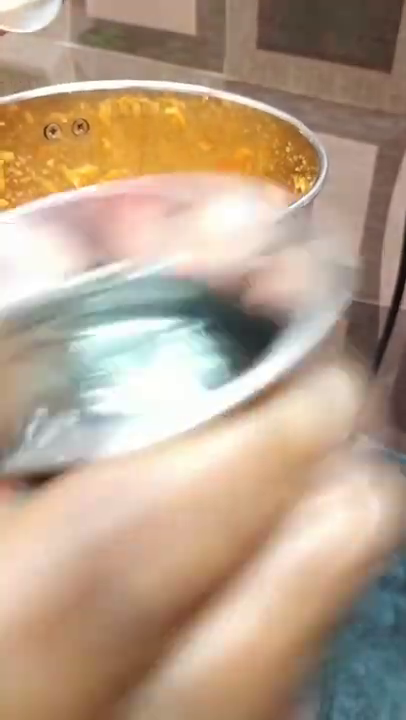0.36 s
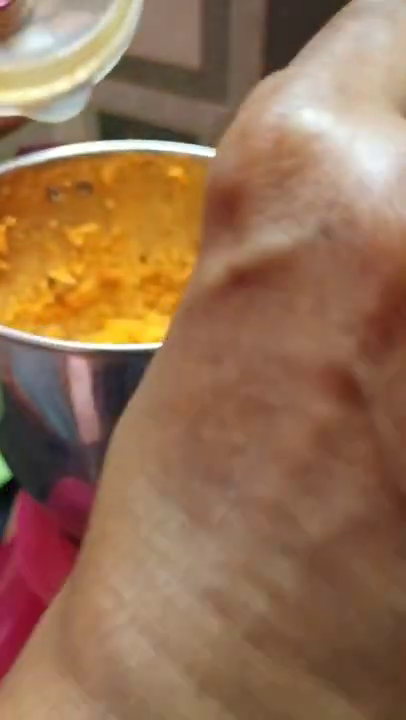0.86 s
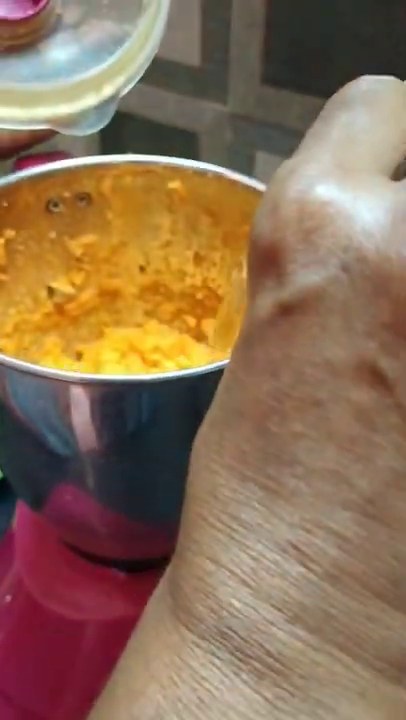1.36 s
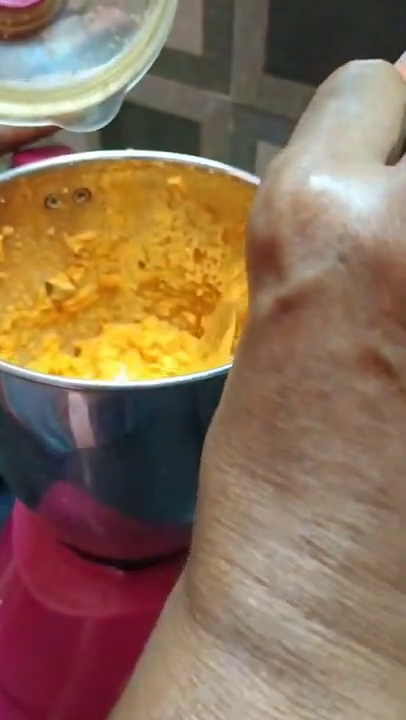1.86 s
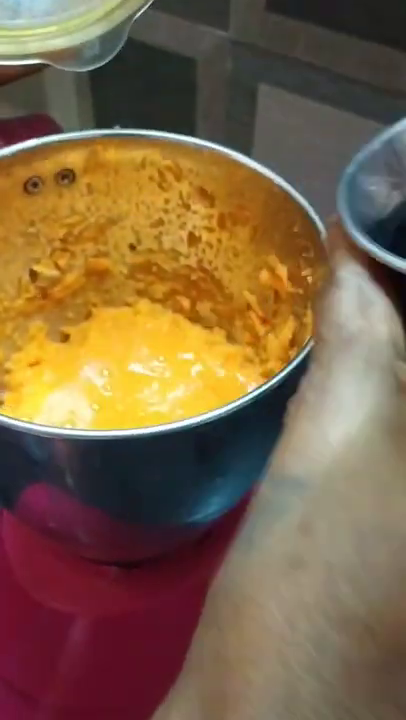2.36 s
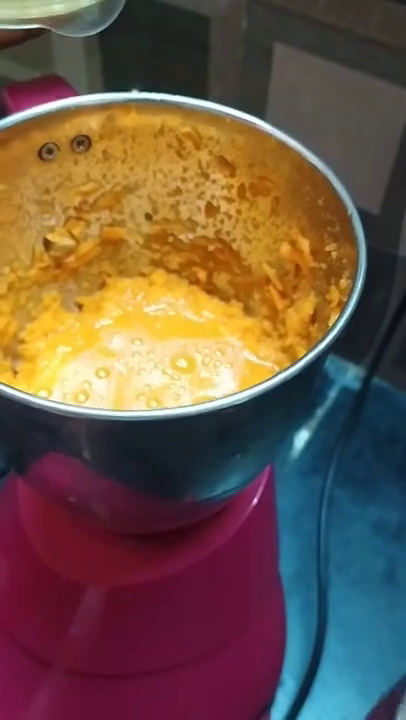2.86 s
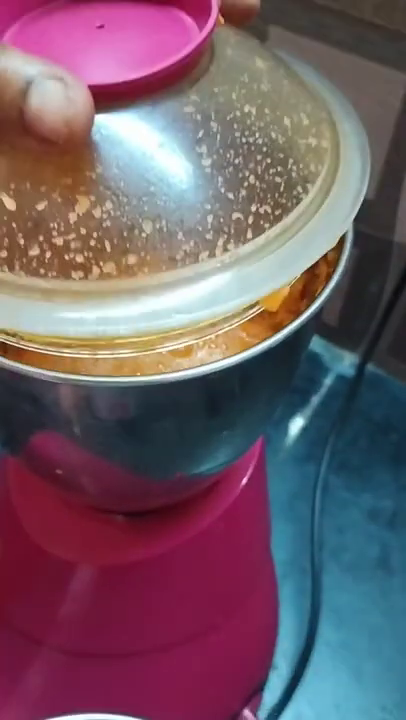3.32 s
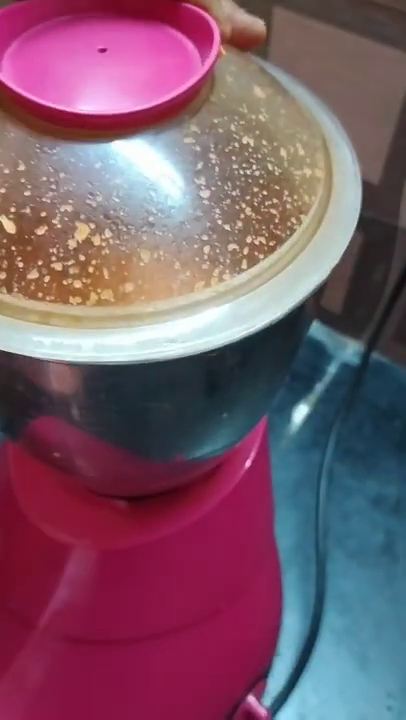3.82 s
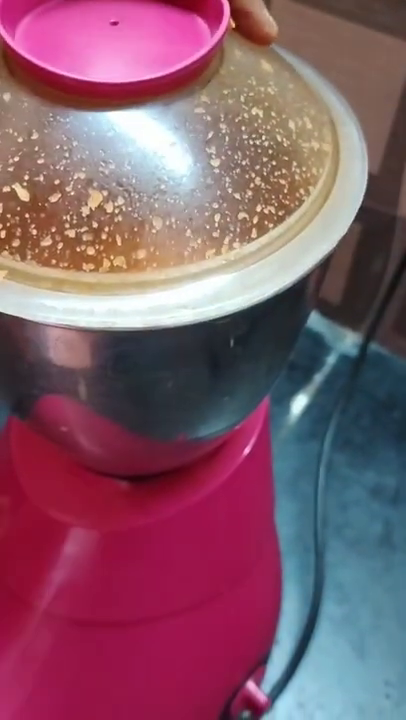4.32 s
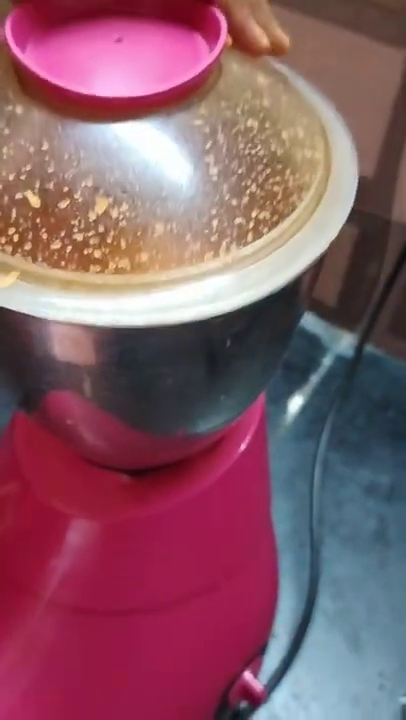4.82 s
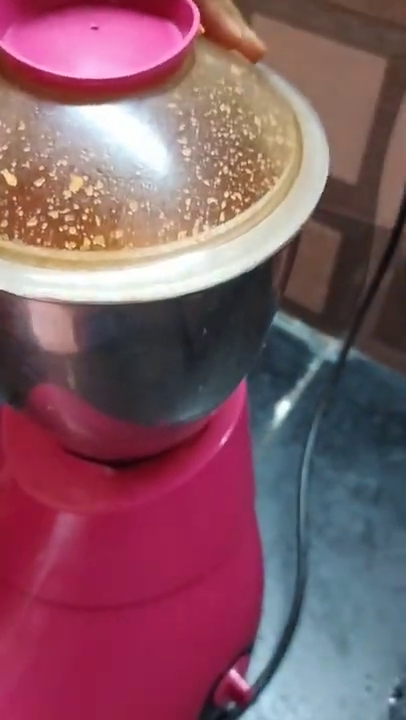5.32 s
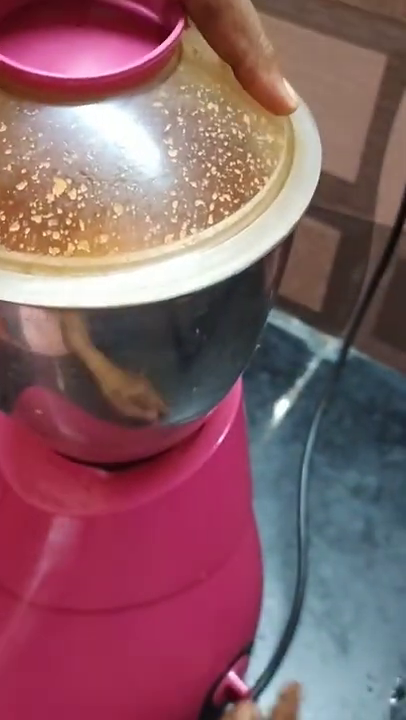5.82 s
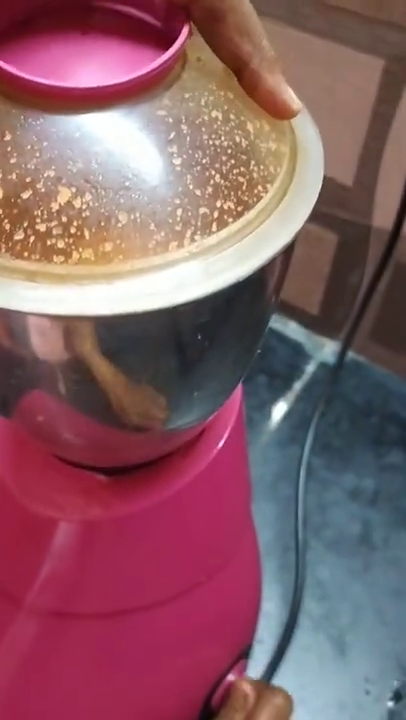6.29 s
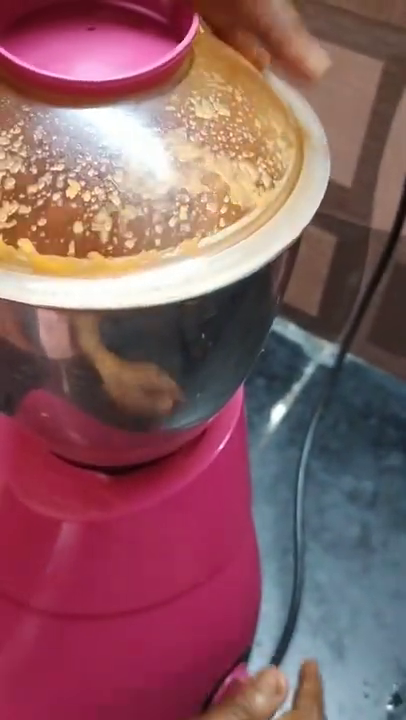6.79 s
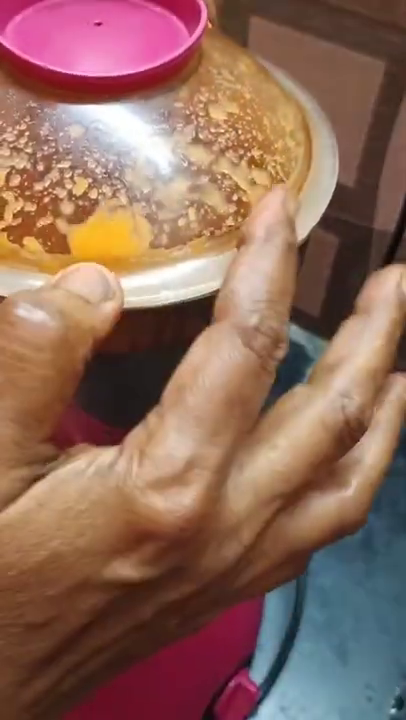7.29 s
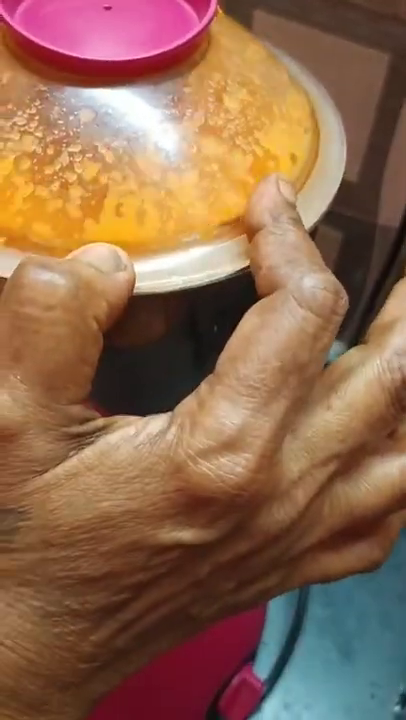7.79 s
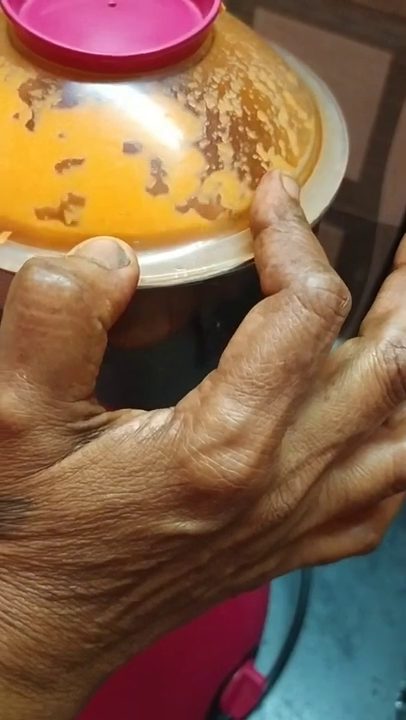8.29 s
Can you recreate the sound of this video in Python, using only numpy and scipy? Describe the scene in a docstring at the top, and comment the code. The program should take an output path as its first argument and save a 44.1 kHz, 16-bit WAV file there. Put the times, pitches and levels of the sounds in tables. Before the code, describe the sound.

Quiet hum first, then water pours onto pulp with bright spatters and low gurgles. Small knocks and a light rustle settle the lid; a metal cup clacks and rings on stone with a short hard echo. A brief near-quiet follows, then a snap and heavy knocks start the blender, much louder than everything before, whirring, booming and hissing with spray. Close stereo handheld microphone, small hard room.

```python
"""A small tiled kitchen with a humming appliance and a few faint far chirps. Water is poured from a steel
cup into a blender jar: flickering noise, gurgles and splash bursts. The lid is pressed on and the cup set
down on the stone counter: bursts, thuds and ringing modes. The motor starts and labours in waves as the
pulp climbs the wall and falls back on the blades: shaft tones on a speed curve, jar boom, churn and spray."""
import sys
import numpy as np
from scipy import signal
from scipy.fft import rfft, irfft, next_fast_len
from scipy.io import wavfile
from scipy.ndimage import uniform_filter1d

SR = 44100
rng = np.random.default_rng(int(sys.argv[2]) if len(sys.argv) > 2 else 0)


def invert_db(level):
    """Linear amplitude ratio for a level in decibels (20 dB per decade), elementwise."""
    return 10 ** (np.asarray(level, dtype=float) / 20)


def unload_wav(signal):
    """Save mono or channel-first audio to the path in sys.argv[1] as 16-bit WAV at rate SR, clipped to [-1, 1]."""
    wavfile.write(
        sys.argv[1],
        SR,
        np.round(np.clip(np.atleast_2d(signal).T, -1, 1) * 32767).astype(np.int16),
    )


N = 381465
T = np.arange(N) / SR


def shape(table, hz, peaks=()):
    """Gain over frequency: spectrum points joined on a log axis, plus resonant bumps."""
    f, db = np.transpose(table)
    db = np.interp(np.log(hz + 1), np.log(f), db)
    return invert_db(db + sum(d / (1 + (2 * (hz - c) / w) ** 2) for c, w, d in peaks))


ALIKE_HZ = 520  # left-right likeness halves here


def spaced(n, alike):
    """Spectra of two noises that agree in the bass only, as at two spaced ports."""
    hz = np.fft.rfftfreq(n, 1 / SR)
    likeness = np.clip(alike, 0, 1) / (1 + (hz / ALIKE_HZ) ** 2)
    mid, side = rfft(rng.standard_normal((2, n)))
    side = side * np.array([[1], [-1]])
    return hz, np.sqrt(1 + likeness) * mid + np.sqrt(1 - likeness) * side


def unit(x):
    """Scales to rms 1."""
    return x / np.sqrt(np.mean(x ** 2))


def walk(n, rate_hz):
    """Random levels held 1 / rate_hz and slewed twice; spread near 1."""
    hold = int(SR / rate_hz)
    steps = np.repeat(rng.standard_normal(n // hold + 1), hold)
    return 1.256 * uniform_filter1d(uniform_filter1d(steps, hold), hold)[:n]


def restless(n, table, peaks, flicker_db, rate_hz, alike=0.96, ripple_db=4.0, per_octave=2):
    """Coloured two-port noise, rms 1, whose bands flicker each on its own."""
    size = next_fast_len(n)
    hz, spectrum = spaced(size, alike)
    # dense narrow resonances of vessel and walls, different at each port
    knots_hz = np.arange(0, SR / 2, 25.)
    ripple = np.array([np.interp(hz, knots_hz, rng.standard_normal(SR // 50)) for _ in "LR"])
    spectrum = spectrum * shape(table, hz, peaks) * invert_db(ripple_db * ripple)
    place = per_octave * np.log2(hz / 30 + 1e-9)
    total = 0
    for k in range(10 * per_octave):
        one_band = irfft(spectrum * np.clip(1 - abs(place - k), 0, 1), size)[:, :n]
        total = total + one_band * invert_db(flicker_db * walk(n, rate_hz))
    return unit(total)


def add(out, s, x):
    """Mixes x in at time s."""
    i = int(s * SR)
    out[..., i:i + x.shape[-1]] += x[..., :N - i]


def band(x, hz, q):
    """Resonant band-pass."""
    return signal.lfilter(*signal.iirpeak(min(hz, SR / 3), q, fs=SR), x)


def burst(db, hz, t60_s, q, pan_db):
    """A snap of noise around hz, decaying 60 dB in t60_s."""
    t = T[:SR // 5]
    envelope = invert_db(-60 * t / t60_s) * (1 - np.exp(-t / 0.00062))
    x = band(rng.standard_normal(len(t)) * envelope, hz, q)
    return invert_db(db + np.array([[pan_db], [-pan_db]]) / 2) * x / abs(x).max()


def curves(table, t):
    """The columns of a table at times t."""
    s, *columns = np.transpose(table)
    return [np.interp(t, s, c) for c in columns]


def swells(t, times, peaks_db, rise_s, fall_s):
    """Bell-shaped swells, summed."""
    return sum(invert_db(db) * np.exp(-((t - s) / np.where(t < s, rise_s, fall_s)) ** 2)
               for s, db in zip(times, peaks_db))


# room air spectrum: (frequency [Hz], relative density [dB per Hz])
AIR = [(12, -32), (20, 4.5), (58, -2), (70, -15), (153, -7), (208, -7), (494, -12.5), (552, -14),
       (793, -16.5), (964, -17), (2050, -19.5), (2560, -18), (4590, -28), (9750, -15.5), (15700, -41.5)]
# room air bumps: (centre [Hz], width [Hz], height [dB])
AIR_PEAKS = [(49, 29, 7), (517, 75, 12.5), (811, 55, 13)]
AIR_DB = -56


def room_air():
    """Steady room noise: coloured bands that flicker slowly."""
    return restless(N, AIR, AIR_PEAKS, 1.53, 8, alike=0.53, per_octave=1) * invert_db(AIR_DB)


# appliance tones: (frequency [Hz], mean rms level [dB])
HUM = [(96.9, -74.5), (145.3, -70.5), (294.5, -74), (393.0, -67.5), (441.4, -63.5), (489.9, -65),
       (635.2, -75.5), (1276, -89), (2401, -87), (2449, -91), (2595, -72)]


def appliance_hum():
    """Sum of wavering sines, out of phase between ports in proportion to frequency."""
    out = np.zeros((2, N))
    for hz, db in HUM:
        phase = 2 * np.pi * rng.random() + hz / 300 * np.array([[0], [1]])
        level = np.sqrt(2) * invert_db(db + 1.25 * walk(N, 2.77))
        out += level * np.sin(2 * np.pi * hz * T + phase)
    return out


# faint chirps: (time [s], peak level [dB], frequency [Hz], length [s])
CHIRPS = [(.0, -62, 2460, 0.035), (0.248, -54, 2400, 0.028), (0.506, -53, 2390, 0.029)]


def far_chirps():
    """Short sine pips with smooth onset and release."""
    out = np.zeros(N)
    for s, db, hz, length_s in CHIRPS:
        t = T[:int(length_s * SR)]
        add(out, s, invert_db(db) * np.hanning(len(t)) * np.sin(2 * np.pi * hz * t))
    return out


# water flow: (time [s], level [dB])
POUR = [(0.6, -64), (0.8, -72), (1.22, -66), (1.28, -63.5), (1.45, -53.5), (1.52, -60), (1.76, -58.5),
        (2.09, -46.5), (2.2, -58), (2.33, -48.5), (2.36, -43.5), (2.48, -66), (2.7, -71)]
# stream spectrum: (frequency [Hz], relative density [dB per Hz])
STREAM = [(590, -40), (1000, -12), (1450, -8), (1820, 3), (2040, -0.5), (3350, -3.5), (5010, -10),
          (9230, 3.5), (15700, -24)]
# air escaping: (time [s], level [dB])
GLUGS = [(1.06, -73), (1.21, -72), (1.44, -63), (2.08, -55), (2.22, -50), (2.36, -54), (2.43, -54),
         (2.62, -58)]
GURGLE_RE_FLOW_DB, GLUG_RISE_S, GLUG_FALL_S = -3.5, 0.0105, 0.021


def pouring():
    """A thin stream crackles on the pulp as random grains; trapped air gurgles in low bands."""
    s, flow_db = np.transpose(POUR)
    n = int((s[-1] - s[0]) * SR)
    t = s[0] + T[:n]
    flow = invert_db(np.interp(t, s, flow_db))
    grains = (rng.random(n) < 600 / SR) * invert_db(2.5 * rng.exponential(size=n))  # 600 per s
    crackle = 0.69 + unit(signal.lfilter([1], [1, -.97], grains))
    stream = unit(restless(n, STREAM, (), 4.1, 24.74) * crackle) * flow
    # (frequency [Hz], relative density [dB per Hz])
    gurgle_spectrum = [(100, -12), (200, 5), (500, -4), (800, 3.5), (1200, -12.5), (3000, -27)]
    glugs = swells(t, *np.transpose(GLUGS), GLUG_RISE_S, GLUG_FALL_S)
    gurgle = restless(n, gurgle_spectrum, (), 3.6, 29.4, alike=1.0)
    gurgle = gurgle * (invert_db(GURGLE_RE_FLOW_DB) * flow + glugs)
    fade = np.clip(np.minimum(t - s[0], s[-1] - t) / 0.13, 0, 1)
    out = np.zeros((2, N))
    add(out, s[0], fade * (stream + gurgle))
    return out


# larger splashes: (time [s], level before pan [dB], centre [Hz])
SPLASHES = [(1.2083, -38, 7060), (1.284, -35.5, 9300), (1.3519, -31.5, 9400), (1.368, -30.5, 7000),
            (1.417, -31, 9070), (1.4357, -33, 7200), (1.5127, -35.5, 8820), (1.731, -41.5, 4480),
            (1.77, -36, 10100), (1.8118, -40, 7640), (1.8874, -28.5, 9600), (1.931, -33, 2560),
            (1.9605, -36, 9140), (1.9794, -15.5, 8450), (2.063, -25, 8900), (2.2588, -30, 9200),
            (2.288, -25.5, 10100), (2.307, -27, 9600), (2.3378, -33, 3360), (2.4, -27.5, 9100),
            (2.4181, -29, 8000)]
SPLASH_T60_S, SPLASH_PAN_DB, PAN_SCATTER_DB = 0.016, -8.5, 4  # pan: left minus right
DROPS_S, DROP_COUNT, DROP_HZ = (1.3, 2.45), 20, 8600
DROP_RE_FLOW_DB, DROP_SCATTER_DB = 15.5, 1.5


def splashing():
    """Larger splashes at set times and small drops at random, each a noise burst."""
    out = np.zeros((2, N))
    when = rng.uniform(*DROPS_S, DROP_COUNT)
    size, tone = rng.standard_normal((DROP_COUNT, 2)).T
    drop_db = curves(POUR, when)[0] + DROP_RE_FLOW_DB + DROP_SCATTER_DB * size
    drops = zip(when, drop_db, DROP_HZ * 2 ** (.3 * tone))
    for s, db, hz in SPLASHES + list(drops):
        pan_db = SPLASH_PAN_DB + PAN_SCATTER_DB * rng.standard_normal()
        add(out, s, burst(db, hz, SPLASH_T60_S, 3.0, pan_db))
    return out


# fingers, cup and knob: (time [s], level before pan [dB], centre [Hz], left minus right [dB])
TICKS = [(0.6526, -46, 2370, -13), (3.1517, -38, 9110, 1), (3.491, -41, 9020, 3), (5.473, -34.5, 8900, -3),
         (5.7174, -53, 8900, 7), (6.0163, -37.5, 10040, 14), (6.0288, -37, 1480, 0.1),
         (6.4314, -22.5, 2780, 12), (6.4443, -3, 8200, 8.5)]
TICK_T60_S = 0.04


def ticks():
    """Dry contacts: short wide-band noise bursts."""
    out = np.zeros((2, N))
    for s, db, hz, pan_db in TICKS:
        add(out, s, burst(db, hz, TICK_T60_S, 1.0, pan_db))
    return out


# water, lid, base and first lumps: (time [s], level [dB], settled pitch [Hz], t60 [s])
THUDS = [(2.067, -47, 404, 0.066), (2.35, -43.5, 213, 0.11), (3.494, -41, 290, 0.077),
         (3.519, -41.5, 222, 0.11), (3.582, -34, 284, 0.19), (3.619, -38.5, 160, 0.25),
         (4.048, -42.5, 180, 0.13), (4.327, -43.5, 226, 0.071), (4.483, -53, 219, 0.13),
         (4.617, -51, 390, 0.1), (4.714, -46, 180, 0.12), (4.882, -20.5, 205.4, 0.081),
         (5.155, -43, 170, 0.1), (5.235, -45, 175, 0.12), (5.474, -52, 285, 0.1), (6.024, -39.5, 222, 0.11),
         (6.246, -43, 315, 0.061), (6.434, -29.5, 303, 0.11), (6.458, -21, 227, 0.13),
         (6.494, -13.5, 307, 0.085), (6.529, -16, 253, 0.059), (6.554, -11.5, 286, 0.085)]


def thuds():
    """Soft knocks: a decaying sine that starts sharp, plus a weaker noise burst."""
    out, t = np.zeros((2, N)), T[:SR]
    for s, db, hz, t60_s in THUDS:
        bent_t = t + 0.0019 * (1 - np.exp(-t / 0.013))
        envelope = invert_db(db - 60 * t / t60_s) * (1 - np.exp(-t / 0.0013))
        add(out, s, envelope * np.sin(2 * np.pi * hz * bent_t))
        add(out, s, burst(db - 8.5, 720, 0.061, 1.2, 0))
    return out


# lid rim sliding: (time [s], length [s], level [dB], centre [Hz])
RUSTLES = [(3.768, 0.15, -56, 9500)]


def lid_rustle():
    """Sliding friction: band noise with a fluttering level under a smooth arch."""
    out = np.zeros((2, N))
    for s, length_s, db, hz in RUSTLES:
        n = int(length_s * SR)
        flutter = invert_db(db + 4.5 * walk(n, 54))
        add(out, s, flutter * np.hanning(n) * unit(band(rng.standard_normal(n), hz, 2.3)))
    return out


# landings: (time [s], level [dB], rattle decay [s], rim tone [Hz], rim tone re level [dB])
CUP_DOWN = [(4.715, -29.5, 0.0041, 2730, -1.5), (4.883, -5.5, 0.013, 2650, -8)]
# cup modes: (frequency [Hz], relative level [dB], t60 [s])
CUP = [(487, -2.5, 0.15), (733, -13, 0.15), (920, -8, 0.18), (1242, 4, 0.22), (1480, -3, .2),
       (1800, 0, 0.18), (2200, -13, 0.15), (2403, 2, 0.18), (2590, 3, .15), (3580, -7, 0.11),
       (4500, -11, 0.15), (5300, -17, .15), (5650, -1.5, 0.12), (6950, -16, 0.094)]
# clack spectrum: (frequency [Hz], relative density [dB per Hz])
CLACK = [(59, -55), (110, -36.5), (184, -7.5), (300, -12.5), (416, -19), (748, -7.5), (1300, -2.5),
         (3110, -10.5), (3610, -7), (4940, -20), (10100, -14.5), (15000, -31.5)]


def cup_on_stone():
    """The rim chatters: a noisy push rings the steel modes and clacks by itself, over a rim tone."""
    out, t = np.zeros((2, N)), T[:SR]
    modes = sum(invert_db(db - 60 * t / t60_s) * np.sin(2 * np.pi * hz * t) for hz, db, t60_s in CUP)
    clack_gain = shape(CLACK, np.fft.rfftfreq(len(t), 1 / SR))
    for s, db, rattle_s, rim_hz, rim_db in CUP_DOWN:
        push = rng.standard_normal(len(t)) * np.exp(-t / rattle_s) * (1 - np.exp(-t / 0.0062))
        clack = irfft(rfft(push) * clack_gain, len(t)) * (t < .5)
        ring = signal.fftconvolve(push, modes)[:len(t)]
        hit = 0.75 * unit(ring) + 1.27 * unit(clack)
        rim = invert_db(rim_db - 60 * t / 0.053) * np.sin(2 * np.pi * rim_hz * t)
        add(out, s, invert_db(db) * (hit / abs(hit).max() + rim))
    return out


# blades: (multiple of shaft rate, mean rms level [dB])
ORDER_TONES = [(3, -41.5)]
USUAL_HZ, SLOTS = 185, 12  # usual shaft speed; rotor slots
TWICE_DB, TWICE_DB_PER_HZ = -15, -0.52  # twice-a-turn tone re imbalance
WHINE_DB, WHINE_DB_PER_HZ, WHINE_FLUTTER_DB = -33.5, 0.25, 2  # slot whine grows with speed


def shaft_tones(t, hz, turn, shake_db):
    """Imbalance once and twice a turn, blade tone and slot whine, all locked to the shaft angle."""
    n = len(t)
    fast_hz = np.maximum(hz - USUAL_HZ, -30)
    settled = np.clip((t - 6.6) / .12, .1, 1)  # the first lumps jolt the shaft out of any pitch
    tones = settled * invert_db(shake_db + 1.4 * walk(n, 20)) * np.sin(turn) * np.ones((2, 1))
    twice_db = shake_db + TWICE_DB + TWICE_DB_PER_HZ * fast_hz
    whine_db = WHINE_DB + WHINE_DB_PER_HZ * (hz - USUAL_HZ) + WHINE_FLUTTER_DB * walk(n, 25.12)
    for k, db in [(2, twice_db), (SLOTS, whine_db)] + ORDER_TONES:
        # each port gets the fine tones by another path
        port_db = db + 2.0 * np.array([walk(n, 14.5), walk(n, 15.8)])
        tones = tones + invert_db(port_db) * np.sin(k * turn + np.array([[0], [.5]]))
    return np.sqrt(2) * tones


# slaps of pulp: (time [s], swell rms level [dB], mean pitch [Hz])
BOOM = [(6.5, -32, 312.2), (6.559, -25, 287.6), (6.855, -22, 285), (6.96, -29.5, 279.3), (7.15, -30.5, 290),
        (7.26, -29, 265.6), (7.4, -32.5, 277.8), (7.51, -31, 303), (7.6, -23, 286), (7.72, -34, 277.5),
        (7.85, -35, 300.2), (8.03, -31, 289), (8.13, -25, 302.4), (8.25, -30.5, 288.8), (8.36, -25.5, 281),
        (8.479, -21, 289.5), (8.64, -22, 278.6)]
BOOM_REST_DB, BOOM_RISE_S, BOOM_FALL_S = -33.5, 0.028, 0.037


def jar_boom(t):
    """Slaps of pulp swell the lowest jar mode, its pitch knocked about."""
    slaps, slap_db, boom_hz = np.transpose(BOOM)
    hz = np.interp(t, slaps, boom_hz) * (1 + 0.0329 * walk(len(t), 40.1))
    phase = 2 * np.pi * np.cumsum(hz) / SR + np.array([[0], [.4]])
    level = invert_db(BOOM_REST_DB) + swells(t, slaps, slap_db, BOOM_RISE_S, BOOM_FALL_S)
    return np.sqrt(2) * level * np.sin(phase)


# spectra: (frequency [Hz], relative density [dB per Hz])
LUMPS = [(30, -27), (110, -19.5), (150, -1), (250, 3.5), (420, -5), (570, -5), (900, -8.5), (1300, -15),
         (3000, -48)]
CHURN = [(410, -30.5), (700, -9), (1170, -6), (1400, -5), (1570, -3.5), (1820, -7.5), (2330, -5),
         (2530, -9), (5000, -13), (6500, -31), (11000, -120)]
SPRAY = [(2650, -65), (4500, -13), (4940, -24.5), (5520, -4), (6030, -9), (9390, 1), (10500, -3.5),
         (12000, -18), (14900, -19), (15700, -28)]
# jar and housing resonances: (centre [Hz], width [Hz], height [dB])
JAR = [(482, 19, 3), (570.6, 14.4, 9), (1176, 140, 4.5), (1563, 64, 5.5), (2930, 540, 3.5), (3580, 70, 6),
       (5230, 97, 10.5), (5630, 130, 6), (6510, 50, 6), (6610, 85, 5.5), (9070, 58, 9), (9830, 120, 4)]
USUAL_FLING_DB = -15
# levels at usual fling and speed; share of fling change; louder when the blades drag
LUMPS_DB, LUMPS_SHARE, LUMPS_DB_PER_HZ = -26, 0.49, -0.0527
CHURN_DB, CHURN_SHARE, CHURN_DB_PER_HZ = -18.5, 1, -0.0426
CHOP_DB, CHOP_S = 6.5, 0.21  # extra level of the first, coarse lumps


def pulp(t, hz, turn, fling_db):
    """Flickering lumps, churn and wall spray, coloured by the jar; returns (lumps + churn, spray)."""
    n = len(t)
    fast_hz, more_db = np.maximum(hz - USUAL_HZ, -30), fling_db - USUAL_FLING_DB
    chop_db = CHOP_DB * np.exp(-((t - START_S) / CHOP_S) ** 2)
    lumps_db = LUMPS_DB + LUMPS_SHARE * more_db + LUMPS_DB_PER_HZ * fast_hz + chop_db
    churn_db = CHURN_DB + CHURN_SHARE * more_db + CHURN_DB_PER_HZ * fast_hz
    lumps = restless(n, LUMPS, JAR, 2.6, 19.9) * invert_db(lumps_db)
    churn = restless(n, CHURN, JAR, 2.26, 25.13, ripple_db=3.5) * invert_db(churn_db)
    spray = restless(n, SPRAY, JAR, 2.45, 18, ripple_db=4.5) * invert_db(fling_db + 0.32 * walk(n, 26.8))
    throb = 1 + 0.093 * np.cos(turn)  # the pulp is flung once a turn
    return lumps + churn, throb * spray


# motor load: (time [s], pulp flung [dB], imbalance [dB])
MOTOR = [(6.44, -23.5, -44), (6.56, -15.5, -36), (6.64, -21.5, -35), (6.82, -14.5, -31.5),
         (6.9, -13.5, -31), (6.98, -15.5, -25), (7.07, -18, -32), (7.14, -13, -44), (7.23, -10.5, -24),
         (7.28, -15, -19), (7.38, -17.5, -32), (7.46, -14, -32.5), (7.5, -13, -51), (7.55, -11, -24),
         (7.67, -16, -26), (7.8, -14.5, -28), (7.87, -11.5, -31), (7.92, -16.5, -23), (8.04, -18.5, -28.5),
         (8.14, -15, -28), (8.23, -13.5, -28.5), (8.33, -13.5, -27), (8.48, -14, -31), (8.56, -13, -24),
         (8.65, -14.5, -30.5)]
# pulp climbs and falls back about three times a second, braking the shaft: (time [s], shaft speed [Hz])
SPEED = [(6.44, 110), (6.7, 168), (6.82, 190), (7.01, 165), (7.15, 200), (7.2, 192), (7.27, 167),
         (7.47, 204), (7.63, 171), (7.8, 205), (7.87, 195), (7.92, 162), (7.98, 170), (8.12, 204),
         (8.33, 186), (8.47, 196), (8.65, 184)]
START_S = 6.443


def blender():
    """Shaft tones on the speed curve over churning pulp, spray on the walls and the booming jar."""
    t = T[T >= START_S]
    fling_db, shake_db = curves(MOTOR, t)
    hz = uniform_filter1d(curves(SPEED, t)[0], SR // 25)
    turn = 2 * np.pi * np.cumsum(hz * (1 + 0.011 * walk(len(t), 70))) / SR  # shaft angle [rad]
    body, spray = pulp(t, hz, turn, fling_db)
    body = body + shaft_tones(t, hz, turn, shake_db) + jar_boom(t)
    out = np.zeros((2, N))
    add(out, START_S, body * np.clip((t - START_S) / 0.014, 0, 1) + spray)
    return out


# echo decay: (frequency [Hz], t60 [s])
ROOM_T60 = [(100, 0.62), (700, 0.65), (2000, 0.53), (5000, 0.48), (12000, 0.44)]


def room(x):
    """Diffuse echo of the tiles: octave bands of decaying noise, the treble dying first."""
    hz, spectrum = spaced(SR, 1.0)
    octave = np.log2(hz / 60 + 1e-9)
    f, t60_s = np.transpose(ROOM_T60)
    t, echo = T[:SR], 0
    for k in range(9):
        noise = irfft(spectrum * np.clip(1 - abs(octave - k), 0, 1), SR)
        echo = echo + noise * invert_db(-60 * t / np.interp(60 * 2 ** k, f, t60_s))
    echo = echo * np.clip(t / 0.0014, 0, 1)
    echo = echo / np.sqrt(np.sum(echo ** 2) / 2)
    return signal.fftconvolve(x[None], echo, axes=1)[:, :N]


def scene():
    """Near sounds reach the ports a little apart and again from the walls."""
    air = room_air() + appliance_hum()
    far = far_chirps()
    stream, splashes = pouring(), splashing()
    touches = ticks() + thuds() + lid_rustle()
    cup = cup_on_stone()
    near = splashes + touches + cup + far
    near = np.array([near[0], np.roll(near[1], -9)])  # right leads by 9 samples
    # the cup lands further off, so more of it comes by the walls
    to_walls = invert_db(-6.0) * splashes + invert_db(-8.5) * touches + invert_db(-3.0) * cup + far
    near = near + room(np.mean(to_walls, axis=0))
    # the microphone dulls above its peak and drops the deep bass
    pickup = signal.butter(3, [90, 11500], "bandpass", fs=SR, output="sos")
    near = signal.sosfilt(pickup, near)
    return air + invert_db([[-1.5], [1.5]]) * stream + blender() + near


def band_limit(x):
    """A steep low-pass at the top of the band."""
    return signal.sosfilt(signal.butter(12, 15820, fs=SR, output="sos"), x)


def record(dry):
    """The converter clips the highest peaks."""
    return band_limit(np.clip(dry, -1, 1))


dry = scene()
out = record(dry)
unload_wav(out)
```